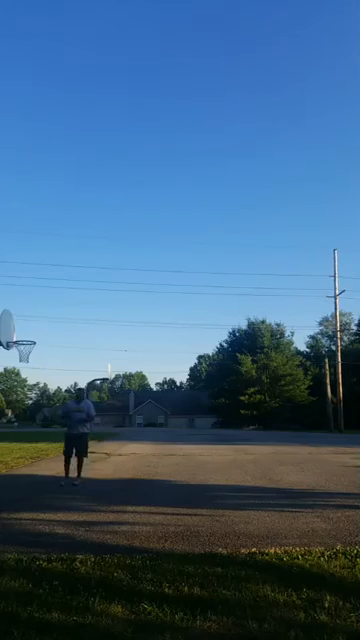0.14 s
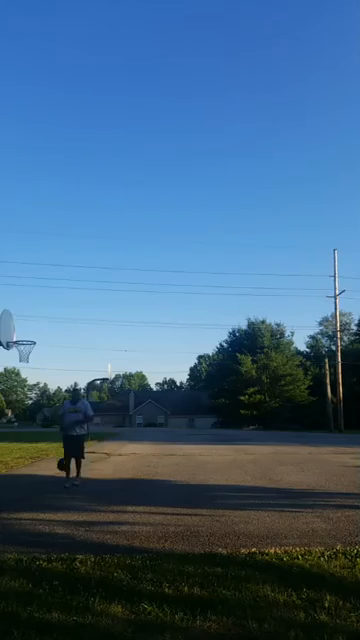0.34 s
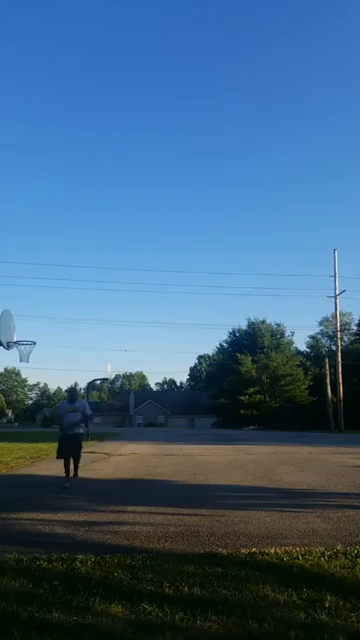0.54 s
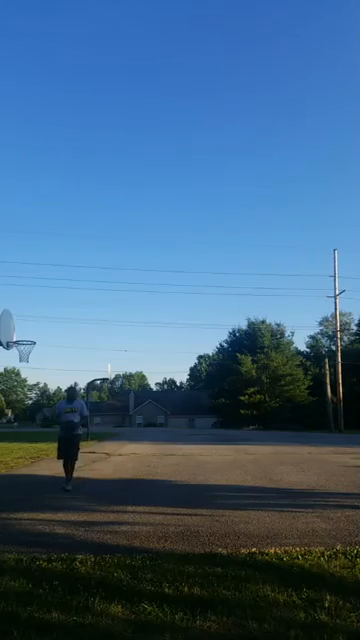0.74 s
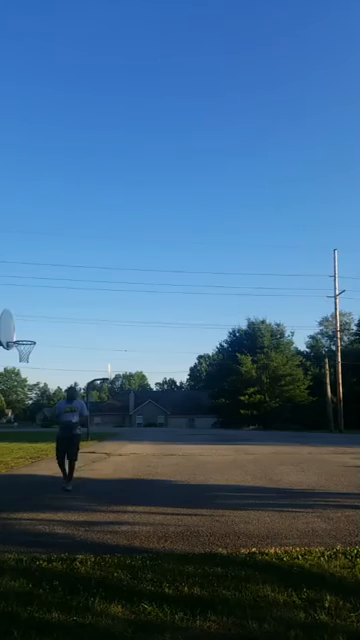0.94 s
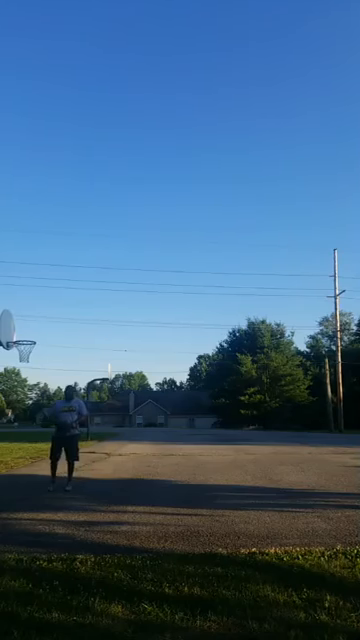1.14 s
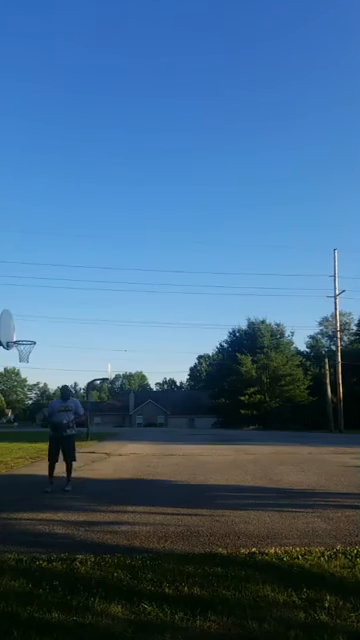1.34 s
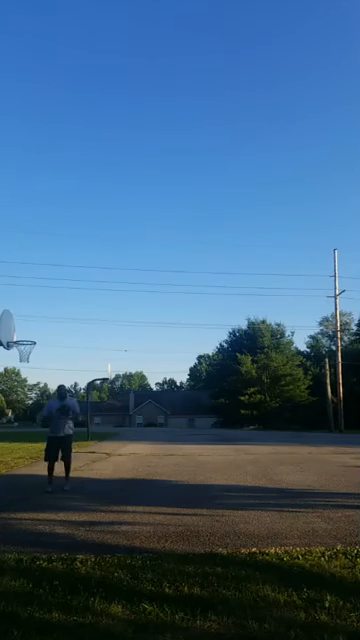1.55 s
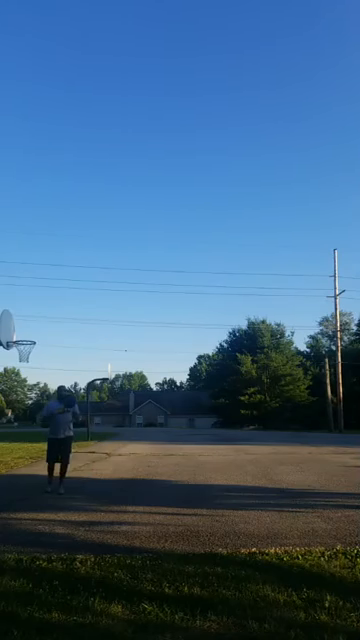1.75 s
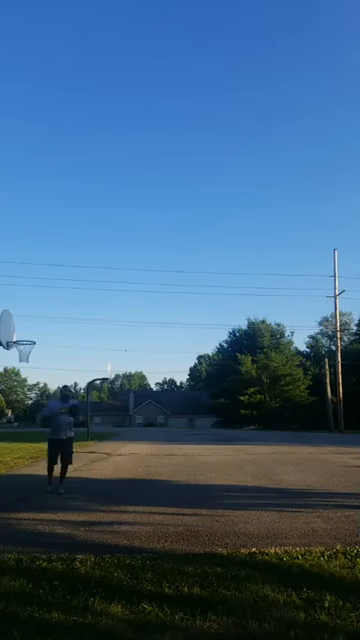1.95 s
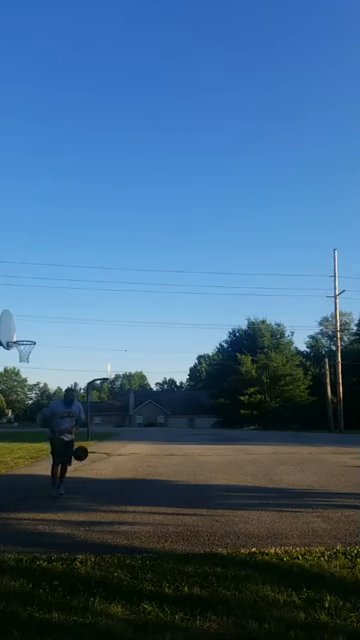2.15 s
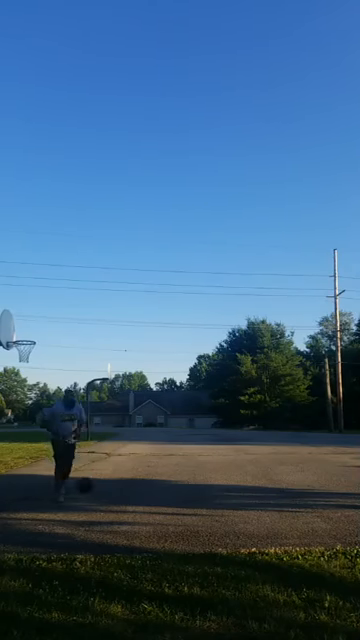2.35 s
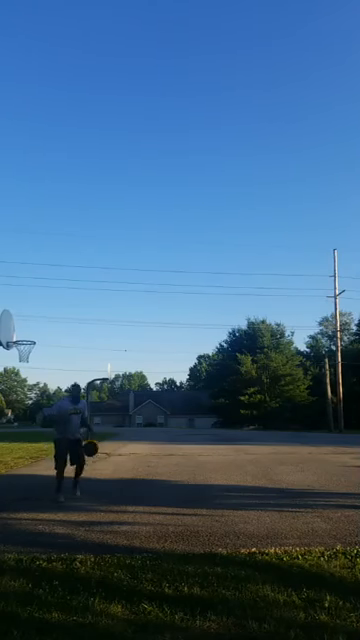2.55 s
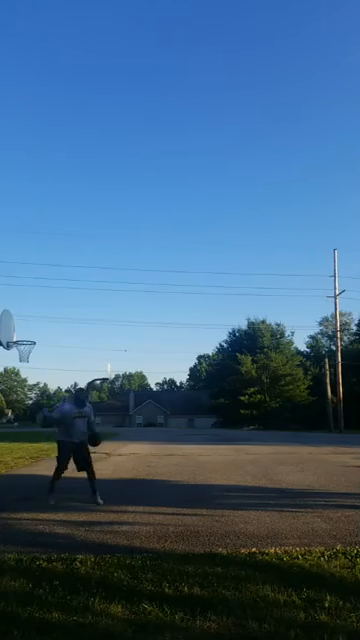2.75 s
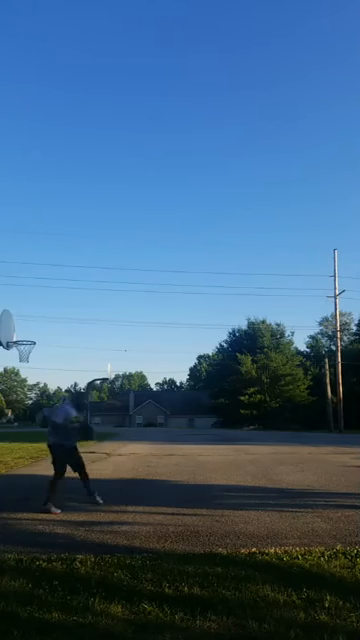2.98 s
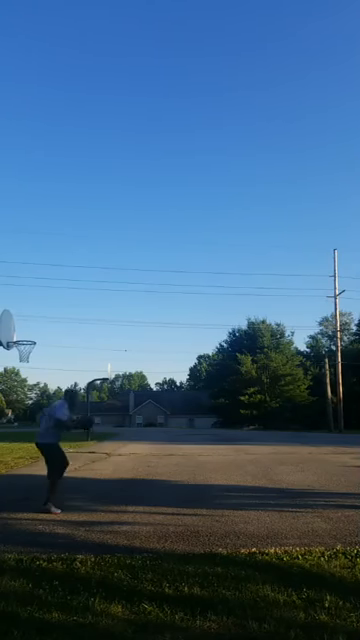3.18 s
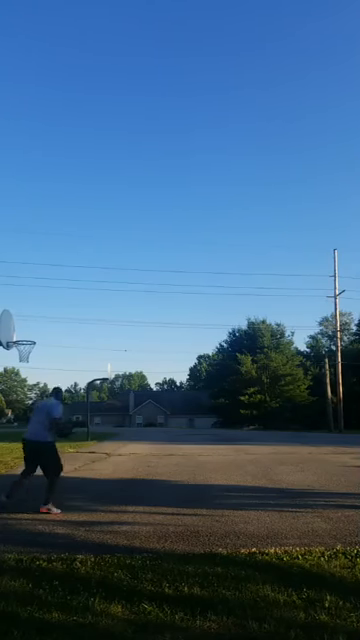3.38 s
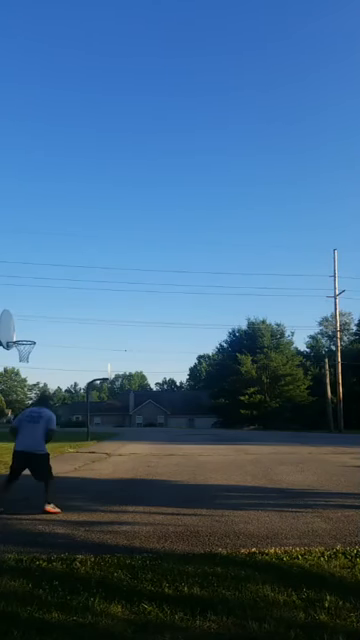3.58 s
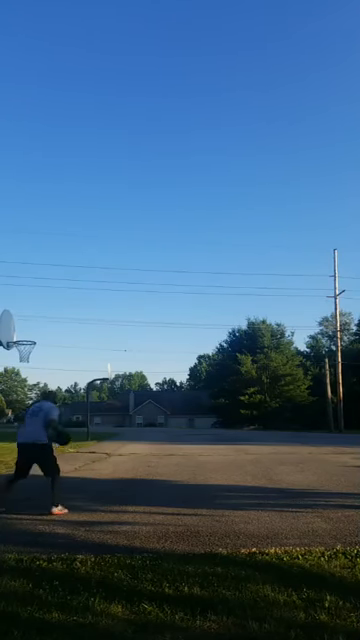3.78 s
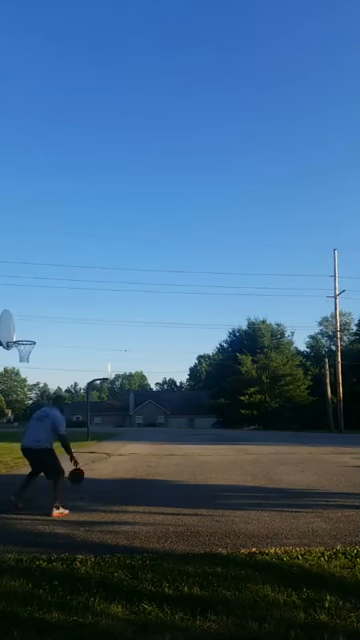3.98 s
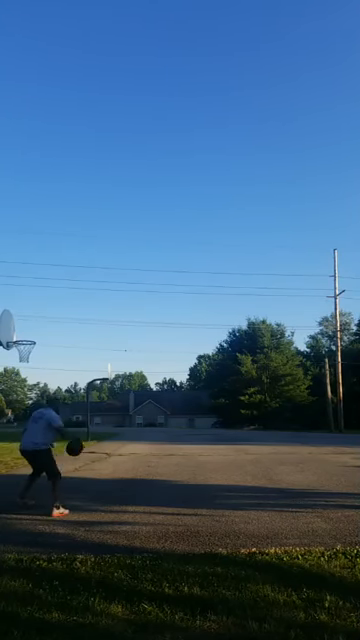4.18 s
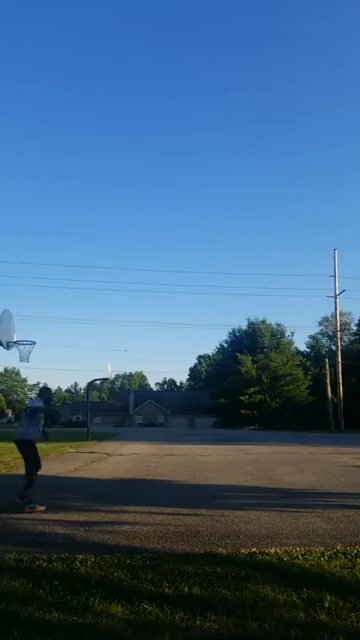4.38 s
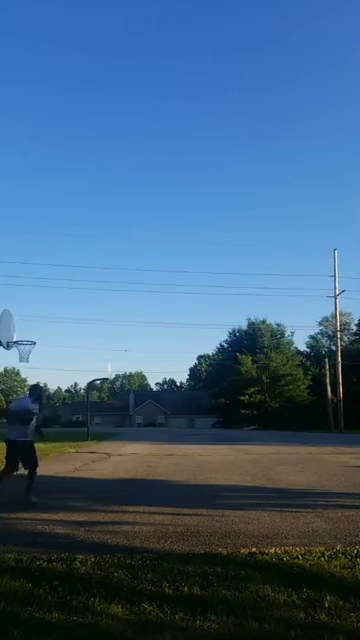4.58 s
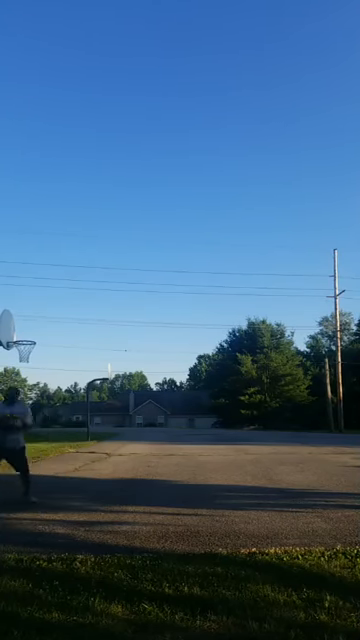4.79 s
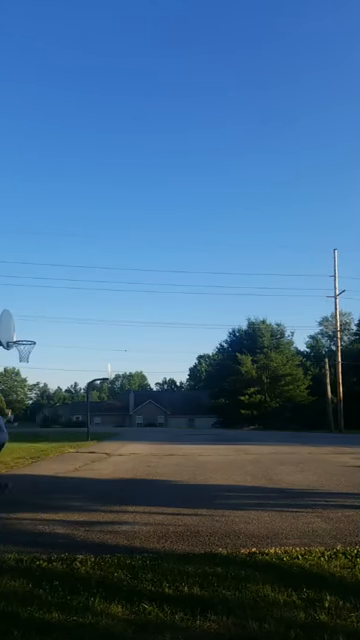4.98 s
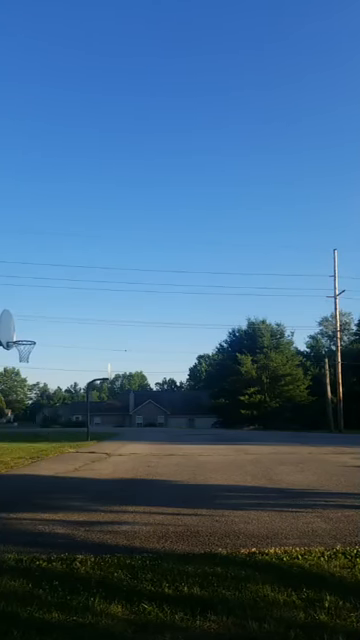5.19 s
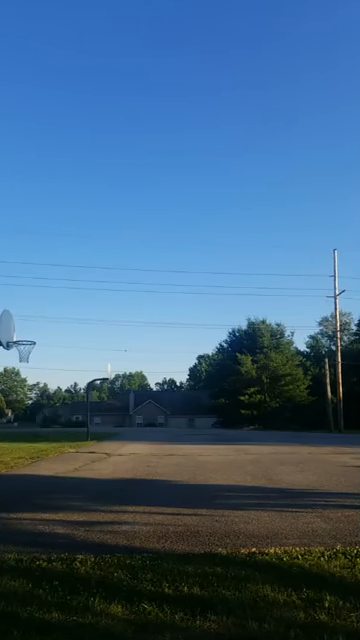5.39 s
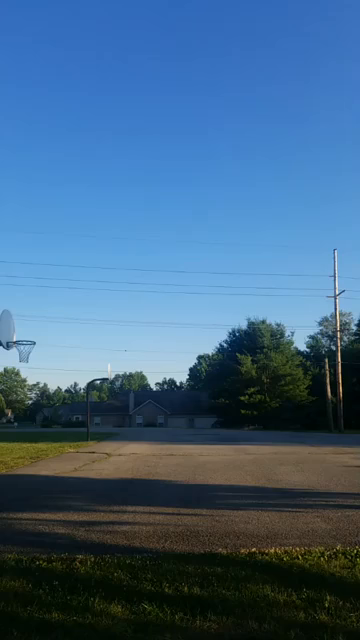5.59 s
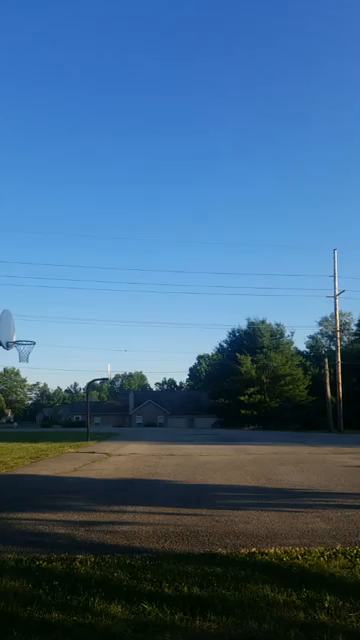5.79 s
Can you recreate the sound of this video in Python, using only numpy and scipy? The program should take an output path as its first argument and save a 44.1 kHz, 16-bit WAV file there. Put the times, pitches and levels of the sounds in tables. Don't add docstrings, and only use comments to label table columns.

```python
import sys
import numpy as np
from scipy import signal
from scipy.fft import rfft, irfft
from scipy.io import wavfile
from scipy.ndimage import uniform_filter1d

SR = 44100
rng = np.random.default_rng(int(sys.argv[2]) if len(sys.argv) > 2 else 0)


def amplitude_ratio(level_db):
    exponent = np.asarray(level_db, float) / 20
    return 10 ** exponent


def to_wav(sig):
    pcm = np.clip(np.atleast_2d(sig), -1, 1) * 32767
    pcm = np.round(pcm).astype(np.int16)
    wavfile.write(sys.argv[1], SR, pcm.T)


N = 257103
T = np.arange(N) / SR


def colour(x, points):
    hz, db = np.transpose(points)
    log_hz = np.log(np.maximum(np.arange(2049) * SR / 4096, 1))
    cepstrum = irfft(np.interp(log_hz, np.log(hz), db) * np.log(10) / 20)
    cepstrum[1:2048] *= 2
    cepstrum[2049:] = 0
    response = irfft(np.exp(rfft(cepstrum)))
    return signal.fftconvolve(x, response)[:len(x)]


def band(x, lo_hz, hi_hz):
    sos = signal.butter(2, [lo_hz, hi_hz], "bandpass", fs=SR, output="sos")
    y = signal.sosfilt(sos, x)
    return y / np.std(y)


def decay(t, t60):
    return np.exp(-np.log(1000) * t / t60)


def ring(hz, t60, rise=1e-5):
    t = T[:SR // 4]
    return np.sin(2 * np.pi * hz * t) * decay(t, t60) * (1 - np.exp(-t / rise))


def add(out, x, s):
    i = int(round(s * SR))
    out[i:i + len(x)] += x[:N - i]


def wander(rate):
    k = int(SR / rate)
    steps = np.repeat(rng.standard_normal(N // k + 1), k)
    return 1.54 * uniform_filter1d(uniform_filter1d(steps, k), k)[:N]


def hum():
    # f/Hz, level/dB per Hz
    outline = [(20, 3), (45, -5), (110, 2.5), (330, -18), (900, -25.5), (2500, -31), (5000, -28),
               (7000, -33), (14000, -19)]
    # t/s, traffic/dB, leaves/dB
    swell_curve = [(0.0, -61, -65.5), (0.28, -59.5, -66.5), (0.49, -57, -62), (0.96, -61.5, -68),
                   (1.61, -63.5, -68), (1.8, -60.5, -64.5), (2.39, -55.5, -63), (2.781, -55.5, -63),
                   (2.92, -57.5, -58), (3.83, -59, -61.5), (4.06, -56.5, -63), (4.32, -54, -62),
                   (4.82, -59, -61.5), (5.83, -56.5, -65)]
    s, traffic_db, leaves_db = np.transpose(swell_curve)
    traffic = np.interp(T, s, traffic_db - traffic_db.mean())
    leaves = np.interp(T, s, leaves_db - leaves_db.mean())
    out = np.zeros(N)
    for hz in 22 * 2 ** np.arange(0, 9.5, .5):
        part = band(rng.standard_normal(N), hz / 2 ** .25, hz * 2 ** .25) * np.sqrt(hz)
        swell = leaves if hz > 350 else traffic
        out += part * amplitude_ratio(swell + 1.9 * wander(6))
    out = colour(out, outline)
    return amplitude_ratio(-53) * out / np.std(out)


def whistles():
    # t/s, length/s, from f/Hz, to f/Hz, level/dB
    peeps = [(0.128, .03, 4770, 5260, -69), (0.253, 0.022, 5280, 5450, -67.5),
             (0.278, .025, 4900, 5570, -65), (0.348, 0.037, 6880, 7350, -57), (.39, .045, 7000, 7560, -68),
             (1.353, .03, 7250, 7530, -69), (1.648, 0.023, 5660, 5700, -72),
             (1.671, .055, 5450, 4370, -73.5), (1.683, 0.055, 7760, 7500, -66),
             (1.791, 0.038, 5850, 6220, -62), (1.829, 0.032, 5820, 6200, -72),
             (3.2, 0.076, 7760, 7340, -69)]
    # t/s, length/s, from f/Hz, to f/Hz, level/dB
    song = [(2.69, 0.049, 2390, 2540, -65.5), (2.718, .03, 2600, 2960, -57),
            (2.778, 0.096, 2620, 2580, -53.5), (2.854, 0.055, 2600, 2255, -49),
            (3.277, 0.078, 3800, 2943, -47), (3.335, 0.019, 3030, 3380, -47.5),
            (3.345, 0.12, 2870, 2014, -47.5), (3.493, 0.067, 2085, 2836, -50.5),
            (3.549, 0.018, 2540, 2190, -53), (3.91, 0.026, 3980, 3080, -47.5),
            (3.935, 0.086, 2667, 2555, -48), (4.011, 0.062, 3274, 3085, -42),
            (4.08, 0.018, 2650, 2550, -49), (4.12, 0.062, 2780, 2700, -47.5),
            (4.188, 0.16, 2920, 2844, -58.5), (4.433, 0.077, 3150, 2590, -63.5)]
    # start t/s, end t/s, rate/Hz, depth/Hz
    warble_span = (3.935, 3.99, 105, 260)
    glide_bend, note_swell = 1.9, .4
    out = np.zeros(N)
    start, end, rate, depth = warble_span
    warble_fade = np.clip((end - T) / 0.022, 0, 1) * (T > start)
    warble = depth * warble_fade * np.sin(2 * np.pi * rate * T)
    waver = .008 * wander(250)
    for s, length, from_hz, to_hz, db in song + peeps:
        gone = T[:int(length * SR)] / length
        glide = to_hz + (from_hz - to_hz) * (1 - gone) ** glide_bend
        i = int(s * SR)
        hz = glide + (warble + waver * from_hz)[i:i + len(gone)]
        tone = np.sqrt(2) * np.sin(2 * np.pi * np.cumsum(hz) / SR)
        add(out, amplitude_ratio(db) * np.sin(np.pi * gone) ** note_swell * tone, s)
    return out


def buzzes():
    # start t/s, end t/s, pulse rate from/Hz, to/Hz, throat f/Hz, level/dB
    calls = [
        (0.356, 0.47, 567, 585, 4300, -70),
        (1.889, 2.018, 393, 414, 4500, -69.5),
        (2.123, 2.23, 396, 410, 4200, -76),
    ]
    out = np.zeros(N)
    for start, end, from_hz, to_hz, throat_hz, db in calls:
        t = T[int(start * SR):int(end * SR)]
        edge = np.clip(np.minimum(t - start, end - t) / 0.019, 0, 1)
        hz = np.interp(t, [start, end], [from_hz, to_hz])
        pulses = np.exp(30 * np.cos(2 * np.pi * np.cumsum(hz) / SR) - 30)
        add(out, amplitude_ratio(db) * edge * band(pulses, 0.88 * throat_hz, 1.14 * throat_hz), start)
    return out


def birds():
    return (whistles() + buzzes()) * amplitude_ratio(1.2 * wander(90))


def press(s, rise, fall, db):
    gain = np.zeros(N)
    near = slice(max(int((s - .3) * SR), 0), int((s + .3) * SR))
    t = T[near]
    away = np.where(t < s, (s - t) / rise, (t - s) / fall)
    gain[near] = amplitude_ratio(db - 20 * away ** 1.13)
    return gain


def scuffs():
    # hardest t/s, rise/s, fall/s, hiss level/dB, weight/dB
    soles = [(.286, .008, 0.065, -61, 3.5), (0.749, .015, 0.17, -60, -20),
             (1.277, 0.048, 0.023, -48, -12), (1.778, 0.021, 0.029, -50, -6),
             (2.285, 0.027, 0.017, -53.5, -28), (2.771, 0.02, 0.032, -47, 3.5),
             (2.87, .02, 0.12, -50, -1), (2.925, 0.049, 0.026, -32.5, -19), (2.961, .01, 0.055, -60, 13),
             (3.04, 0.053, 0.12, -67.5, 10.5), (3.106, 0.026, .03, -47, 16.5),
             (3.121, .01, 0.021, -31, -5), (3.143, 0.011, 0.011, -41.5, 15.5),
             (3.461, 0.15, 0.15, -49.5, -2), (3.493, 0.061, 0.018, -44, -35),
             (3.57, 0.12, 0.032, -61.5, 4.5),
             (3.766, 0.054, 0.014, -51.5, -17), (3.835, 0.026, 0.018, -44.5, -8),
               (3.9, 0.11, .015, -54.5, -2.5), (4.507, .02, 0.062, -50, -6.5), (4.556, 0.091, 0.02, -58, 0),
               (4.614, 0.0082, 0.057, -45.5, -9.5), (4.689, 0.091, 0.075, -47.5, -26),
               (4.758, 0.0071, 0.052, -58, 9), (4.901, 0.089, 0.038, -47.5, -9),
               (5.068, 0.023, 0.017, -57, -8), (5.109, 0.021, 0.0039, -62, 11),
               (5.147, .03, 0.068, -39.5, -1), (5.17, .03, 0.045, -46.5, -6.5),
               (5.22, 0.053, 0.055, -45.5, -11), (5.306, 0.063, 0.017, -49.5, -15),
               (5.478, 0.066, 0.047, -53.5, -7.5), (5.79, 0.093, 0.31, -57, -7.5)]
    # hardest t/s, rise/s, fall/s, level/dB, f/Hz
    groans = [
        (2.876, 0.037, 0.027, -45, 645),
        (2.962, 0.017, 0.038, -44, 494),
        (3.13, .03, .03, -40.5, 330),
    ]
    # hardest t/s, rise/s, fall/s, level/dB
    slides = [
        (.265, .01, .02, -57),
        (1.249, 0.023, .05, -52.5),
        (2.87, 0.02, .05, -48.5),
        (3.759, .03, .015, -59.5),
        (3.83, 0.018, .025, -53),
        (4.7, 0.09, .06, -47.5),
    ]
    grit = rng.standard_normal(N) * amplitude_ratio(3.05 * rng.exponential(size=N)) * amplitude_ratio(2.0 * wander(200))
    hiss, scrape = band(grit, 1997, 4690), band(grit, 1300, 2740)
    rumble, sizzle = band(grit, 150, 1250), band(grit, 5240, 13220)
    out = np.zeros(N)
    for s, rise, fall, db, weight_db in soles:
        mix = 0.86 * hiss + 2.25 * amplitude_ratio(-8) * sizzle
        mix += amplitude_ratio(1 + .6 * weight_db) * scrape + 0.81 * amplitude_ratio(weight_db) * rumble
        out += press(s, rise, fall, db) * mix
    for s, rise, fall, db, hz in groans:
        out += press(s, rise, fall, db) * band(grit, 0.88 * hz, 1.16 * hz)
    toe = band(grit, 5200, 8600) + .9 * band(grit, 7600, 13500)
    for s, rise, fall, db in slides:
        out += press(s, rise, fall, db) * toe
    return out


def taps():
    # t/s, peak level/dB, f/Hz,
    # body/dB
    hits = [(0.3, -31.5, 1790, -11), (0.7766, -49, 3160, -40), (1.7617, -47, 2740, -18.5),
            (1.776, -41.5, 2685, -27), (4.2433, -28, 2900, -10), (2.7545, -39.5, 1950, -3),
            (2.7742, -32.5, 2820, -31), (2.9018, -24, 3920, -10), (2.9224, -16, 3230, -19),
            (3.0889, -31.5, 1610, 5.5), (3.1058, -22, 1710, 2), (3.1136, -17.5, 2700, -5),
            (3.1226, -17.5, 1970, -0.5), (3.1404, -29.5, 1860, 5.5), (3.3894, -34, 2500, -20),
            (3.8367, -24.5, 2670, -38), (1.233, -57, 2940, -16), (4.652, -38, 3220, -16),
            (4.5005, -33.5, 2930, -34), (4.6122, -32.5, 2000, -20), (4.7516, -45, 1620, 17.5),
            (5.0663, -42.5, 4050, -23), (5.1298, -22.5, 1610, -4), (5.1393, -17.5, 2220, -40),
            (5.163, -22.5, 1810, -22), (5.186, -30, 2080, -28), (5.215, -32, 1990, -27),
            (5.2923, -32.5, 2800, -25), (5.304, -27.5, 3100, -43), (5.436, -41.5, 2900, -36)]
    # t/s, peak level/dB, f/Hz, body/dB
    returns = [
        (.604, -51, 1700, -20),
        (.535, -44, 1050, -20),
        (2.488, -41.5, 1300, -6),
        (4.152, -38.5, 1000, -5),
        (4.154, -38, 1750, -17),
        (4.224, -36.5, 1100, 0),
        (4.302, -41.5, 1730, -7),
        (4.352, -45, 1670, -22),
        (4.402, -43, 1683, -26),
    ]
    out, t = np.zeros(N), T[:SR // 20]
    fade = decay(t, 0.019)
    for s, db, hz, body_db, grit in [row + (.34,) for row in hits] + [row + (.08,) for row in returns]:
        noise = rng.standard_normal((2, len(t)))
        noise[0, 4] = -8
        click = fade * (band(noise[0], 0.73 * hz, 1.354 * hz) + grit * band(noise[0], 1100, 9000))
        knock = amplitude_ratio(body_db - 8.5) * band(noise[1], 170.0, 1100) * fade ** .5
        add(out, amplitude_ratio(db + 0.5) * (click / np.abs(click).max() + knock), s)
    return out


def ball():
    # t/s, slap/dB, thump/dB, skin/dB, 918 Hz air mode/dB
    bounces = [
        (0.4707, -7.5, -16.5, -15, -19),
        (2.3501, -7.5, -14, -9, -4),
        (2.9507, -13.5, -37, -26, 8),
        (4.087, -3.5, -8, -19.5, 4),
        (4.755, -45, -38, -36, 25.5),
    ]
    # f/Hz, level/dB, t60/s
    air_modes = [(551.4, -38, 0.063), (918, -22, 0.02), (1753, -7, 0.0151), (2784, -13, 0.012),
                 (3990, -17, 0.014), (6760, -22, 0.0067), (12000, -27, .003), (2780, -47, 0.25),
                 (3780, -48, .15), (1660, -45, .12)]
    # f/Hz, level/dB
    slap_outline = [(300, -32), (750, -21.5), (1300, -5.5), (2400, 0), (4000, -6), (5200, -16), (7000, -23),
                    (14000, -18)]
    # f/Hz, level/dB
    far_outline = [(300, -21), (1200, 0.5), (2500, -6), (5000, -14), (8000, -22), (14000, -3)]
    slaps, thumps, sent, t = np.zeros(N), np.zeros(N), np.zeros(N), T[:SR // 20]
    lift = np.exp(-(T[:SR // 4] / 0.014) ** 4)
    crack = 1. * (t == 0)
    for s, slap_db, thump_db, skin_db, low_db in bounces:
        air = sum(amplitude_ratio(db + low_db * (700 < hz < 1000)) * ring(hz, t60) for hz, db, t60 in air_modes)
        rough = rng.standard_normal(len(t)) * np.exp(-t / 0.0019) * (1 - np.exp(-t / 0.000067))
        contact = 0.026 * rough
        contact[0] = -1
        add(slaps, amplitude_ratio(slap_db) * signal.fftconvolve(contact, air), s)
        add(slaps, amplitude_ratio(slap_db + 2.5) * colour(0.72 * rough - 2.5 * crack, slap_outline), s)
        add(sent, amplitude_ratio(slap_db + 22) * colour(crack, far_outline), s)
        thump = ring(134.7, 0.03 * 1.37, 0.0036) * lift
        skin = ring(245.3, 0.023, 0.0019) * lift
        add(thumps, amplitude_ratio(thump_db + 5.0) * thump, s + 0.0013)
        add(thumps, amplitude_ratio(skin_db + 7.0) * skin, s + 0.0018)
    return slaps, thumps, sent


def comb(x):
    sos = signal.butter(1, [820, 1965], "bandpass", fs=SR, output="sos")
    mids = signal.sosfilt(sos, x)
    return x - 0.61 * np.roll(mids, int(round(SR / 1252)))


def echoes(x):
    # delay t/s, level/dB, smear/s
    faces = [
        (.008, -16.5, 0.0041),
        (0.019, -23, 0.00208),
        (.03, -27.5, .01),
        (.05, -27, 0.011),
        (0.067, -29.5, 0.0053),
        (.137, -32.5, 0.0044),
        (.156, -39.5, 0.0028),
        (0.264, -52, 0.0051),
        (0.317, -45, 0.011),
    ]
    walls, t = np.zeros(SR // 2), T[:SR // 10]
    for delay, db, smear in faces:
        patch = rng.standard_normal(len(t)) * np.exp(-t / smear)
        add(walls, amplitude_ratio(db) * patch / np.sqrt(np.sum(patch ** 2)), delay)
    return signal.fftconvolve(x, walls)[:N]


def field(x):
    t = T[:SR]
    tail = band(rng.standard_normal(SR), 800, 21000) * decay(t, 0.94) * np.clip(t / 0.01, 0, 1)
    return signal.fftconvolve(x, tail / np.sqrt(np.sum(tail ** 2)))[:N]


def scene():
    slaps, thumps, sent = ball()
    feet = taps() + scuffs()
    song = birds()
    walls = echoes(sent + .15 * slaps + 0.27 * thumps)
    far = field(amplitude_ratio(-22) * comb(sent + feet) + amplitude_ratio(-8.5) * song)
    near_ground = comb(slaps + feet + hum() + walls)
    return (near_ground + thumps + song + far)[None]


def low_pass(x):
    return signal.sosfilt(signal.butter(12, 14690, fs=SR, output="sos"), x)


def record(dry):
    # f/Hz, level/dB
    tone_outline = [(25, -18.5), (60, -1.5), (6900, 2), (7450, -6.5), (7950, -18.5), (10200, -25.5), (10800, -18.5),
                    (14000, -15.5), (14600, -44.5), (15700, -53.5), (16000, -81.5)]
    mix = colour(dry[0], tone_outline)[None]
    return low_pass(mix)


dry = scene()
out = record(dry)
to_wav(out)
```